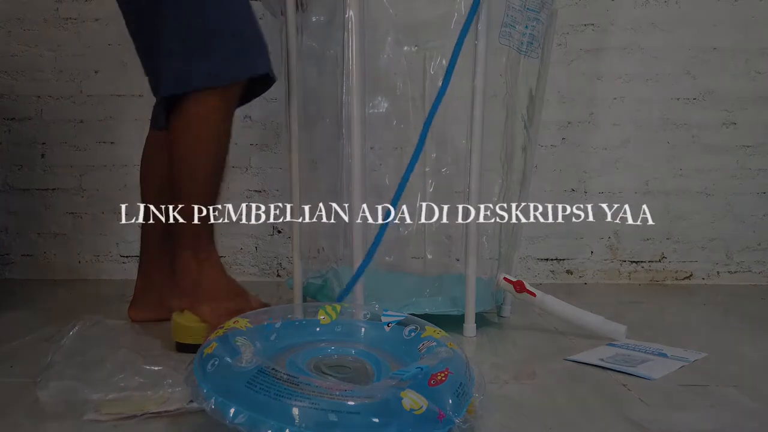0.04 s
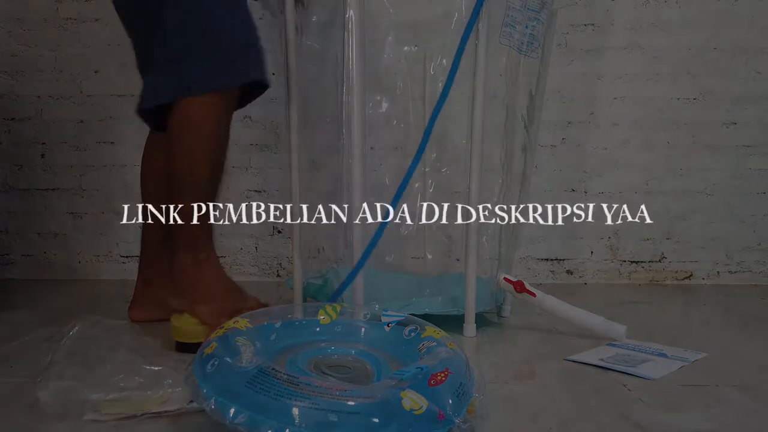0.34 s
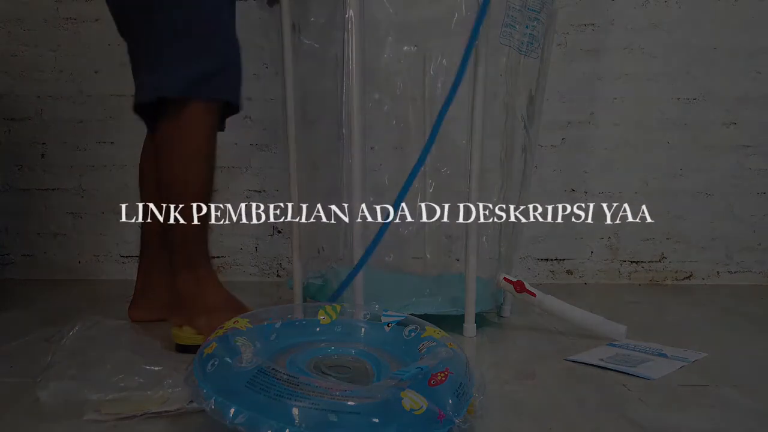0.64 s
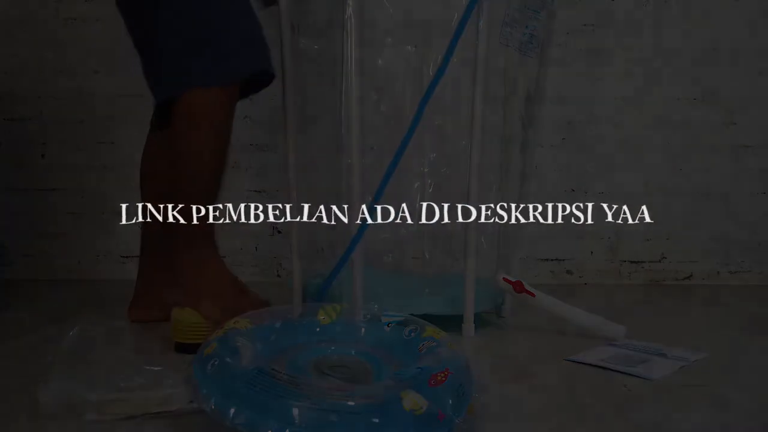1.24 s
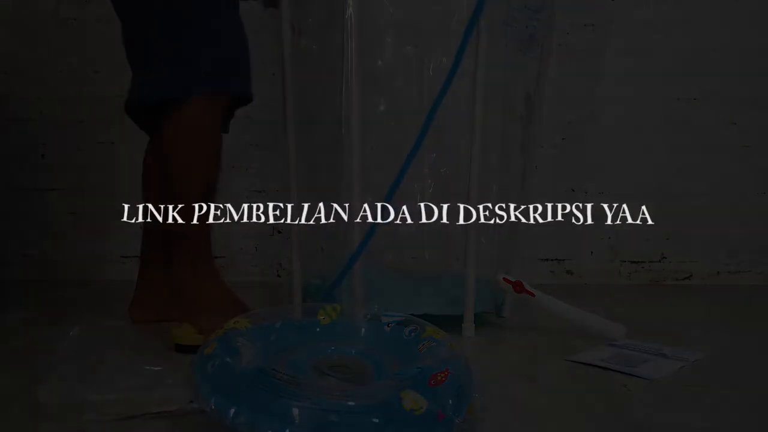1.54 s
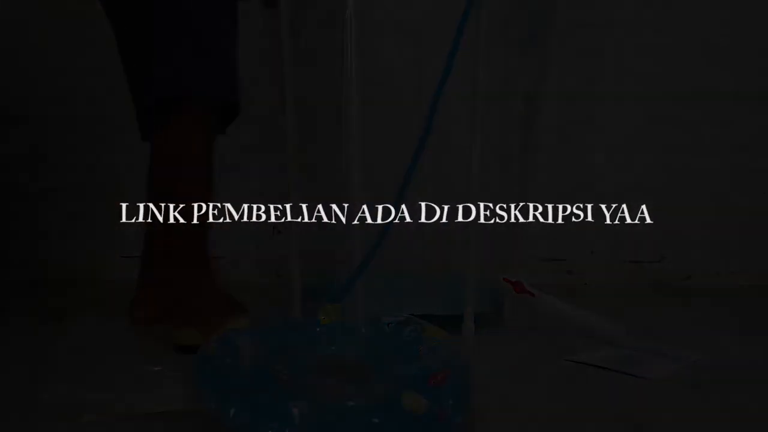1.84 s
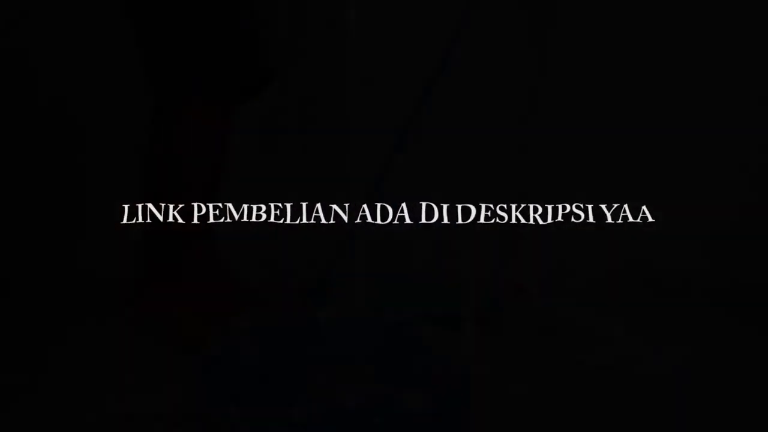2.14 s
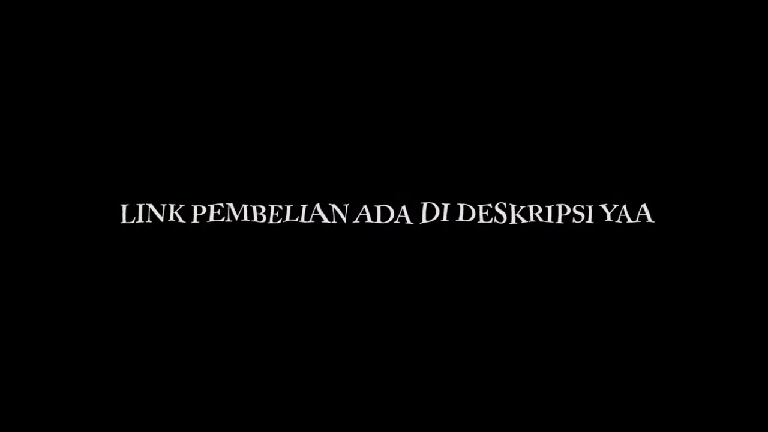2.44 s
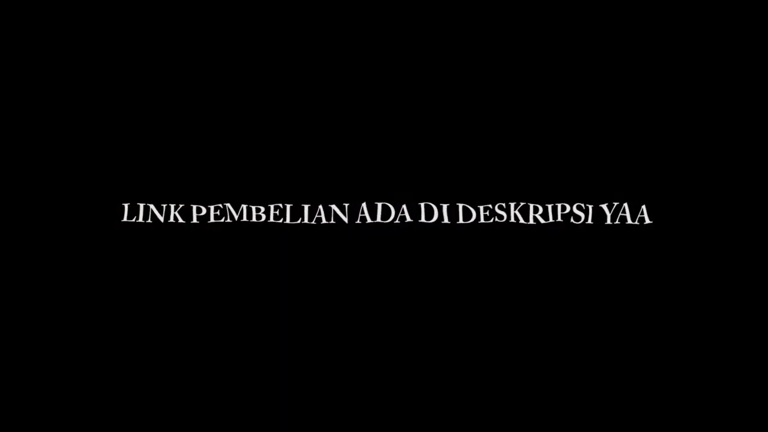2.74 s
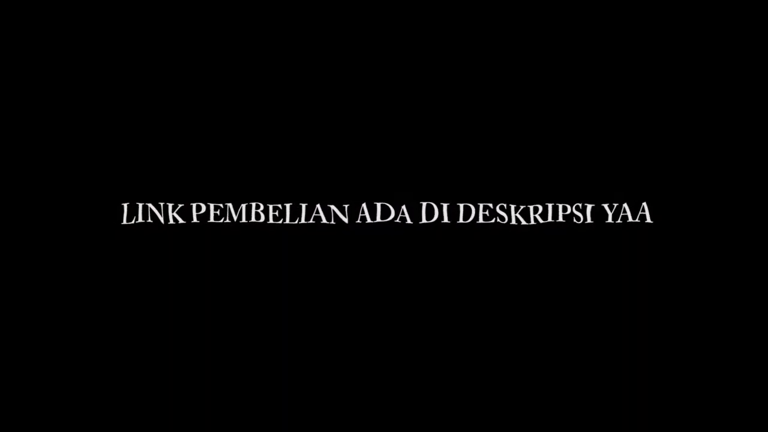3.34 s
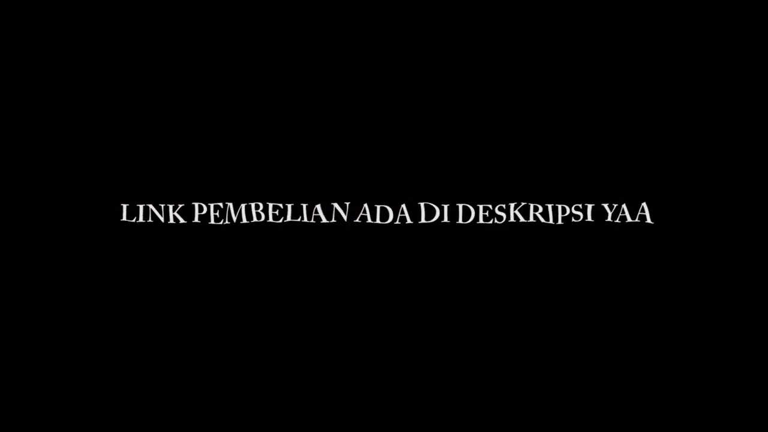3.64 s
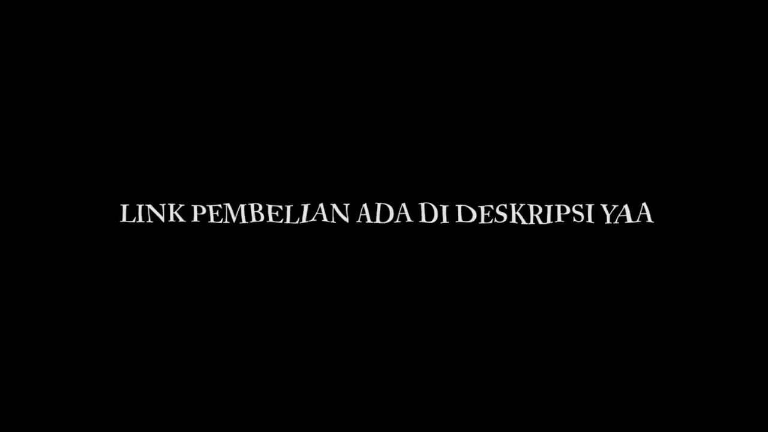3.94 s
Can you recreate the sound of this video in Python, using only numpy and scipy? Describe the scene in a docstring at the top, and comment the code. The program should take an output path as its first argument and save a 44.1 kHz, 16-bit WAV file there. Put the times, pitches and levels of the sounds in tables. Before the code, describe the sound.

A foot pump hisses and whistles in a quick, steady rhythm, filling an inflatable.

```python
"""A bare, ringing room, where a plastic bellows foot pump is trodden nine times to fill an inflatable.
Each downstroke hisses through the hose and makes the valve whistle: the pitch arches with the air flow,
sings out at moderate flow and turns breathy at high flow. The bellows flop under the foot, pop back
and suck in air with a brighter hiss. A faint mains hum lies underneath."""
import sys
import numpy as np
from scipy import signal
from scipy.fft import rfft, irfft, next_fast_len
from scipy.io import wavfile
from scipy.ndimage import map_coordinates

SR = 44100
rng = np.random.default_rng(int(sys.argv[2]) if len(sys.argv) > 2 else 0)


def master(y):
    """Save y as 16-bit WAV."""
    cut = np.clip(np.atleast_2d(y).T, -1, 1)
    pcm = np.round(cut * 32767)  # scale
    wavfile.write(sys.argv[1], SR, pcm.astype(np.int16))


N = 176400

# downstrokes of the foot: start_s, length_s, top_pitch_hz, whistle_db, hiss_db
DOWNSTROKES = [(0.018, .131, 3441, -31.5, -35), (0.456, .13, 3530, -32.5, -35.5),
               (0.845, 0.15, 3482, -34.5, -35.5), (1.297, 0.14, 3810, -35.5, -33.5),
               (1.724, .141, 3070, -30, -38.5), (2.17, .163, 3526, -34.5, -35),
               (2.627, .153, 3607, -34, -34.5), (3.083, .153, 3108, -34, -38.5),
               (3.521, 0.14, 3128, -32.5, -37)]
# the bellows refill: start_s, length_s, level_db
INTAKES = [(-.10, 0.14, -33.5), (0.244, 0.19, -32.5), (0.643, .18, -34), (1.074, 0.18, -33),
           (1.517, .14, -38), (1.59, 0.13, -42), (1.954, 0.16, -33.5), (2.4, 0.19, -31.5),
           (2.859, 0.19, -33.5), (3.309, 0.18, -33.5), (3.751, 0.21, -33.5)]
# the bellows flop under the foot: start_s, level_db
FLOPS = [(.042, -42), (.135, -41), (.198, -38), (.235, -47), (.464, -40.5), (.843, -43.5), (1.265, -44),
         (1.315, -40.5), (1.708, -53.5), (2.148, -62), (2.615, -46), (2.756, -45), (2.835, -39),
         (3.069, -40.5), (3.52, -42.5), (3.78, -48.5)]
# the pleats pop back: start_s, level_db
PLEAT_POPS = [(.278, -47.5), (.591, -41.5), (.994, -46.5), (1.455, -42.5), (1.873, -49.5), (2.337, -43.5),
              (2.794, -42), (3.25, -48), (3.714, -44)]
# the sole scuffs on the pump: start_s, level_db
SOLE_SCUFFS = [(1.32, -48), (2.18, -46), (2.637, -36.5), (3.09, -45), (3.537, -36)]

# low rumble of the room tone: frequency_hz, gain_db
ROOM_TONE_EQ = [(20, 2), (60, -7.5), (110, -1), (170, -10), (400, -18), (1500, -17), (5000, -22.5),
                (16000, -53)]
# dull thud of a flop: frequency_hz, gain_db
FLOP_EQ = [(40, -20), (100, 10), (160, -6.5), (215, 10), (320, -5.5), (440, 0.5), (600, -2.5), (900, -17),
           (2000, -8), (6000, -27)]
# midrange rasp of the sole: frequency_hz, gain_db
SCUFF_EQ = [(30, -36), (150, 7), (380, -13), (600, 2), (850, 0), (1150, -6.5), (1750, 8), (2600, -4.5),
            (4000, -11), (9000, -14), (16000, -26)]
# hollow knock of a pleat: frequency_hz, gain_db
POP_EQ = [(30, -45), (80, -28), (160, -8), (225, 2.5), (320, 3.5), (450, -3), (800, -2), (1300, -9),
          (4000, -39), (12000, -55)]
# wide hiss of outgoing air: frequency_hz, gain_db
HISS_EQ = [(30, -40), (100, -29), (220, -3.5), (450, -16), (1000, -5), (1800, -5.5), (3000, -16),
           (4700, -5), (6200, -2), (7200, 1.5), (8600, -3), (10300, -2.5), (12500, -3.5), (14300, -2),
           (16000, -29.5)]
# breathy band around the whistle: frequency_hz, gain_db
BREATH_EQ = [(1000, -30), (1800, -14.5), (2450, -3), (2850, 3.5), (3350, -7), (3800, -8), (4500, -28)]
# bright hiss of incoming air: frequency_hz, gain_db
INTAKE_EQ = [(200, -29), (1100, -15), (1900, -5), (3500, -3), (5500, -4), (7200, 0), (9500, 6.5),
             (11500, 2.5), (14000, 2), (16000, -9)]
# rough chirp of the opening valve: frequency_hz, gain_db
CHIRP_EQ = [(2200, -45), (2700, -3), (2900, -1), (3050, 3), (3500, -40)]
# shrill upper resonances of the valve: centre_hz, width_hz, gain_db
VALVE_RESONANCES = [(6150, 140, -13), (7610, 590, 4), (9980, 970, -0.5), (14900, 310, -3)]

# ring of the bare walls: frequency_hz, t60_s
ROOM_DECAY = [(100, 0.89), (500, 0.39), (1500, 0.73), (3000, 0.56), (7000, 0.56), (11000, 0.63),
              (15000, 0.22)]
# how alike left and right are: frequency_hz, correlation (clipped to -1..1 in use)
STEREO_IMAGE = [(40, 0.77), (120, 1), (600, .97), (1300, 0.98), (2900, 0.79), (5000, 0.67), (6200, 0.4),
                (7400, -0.072), (8900, 1), (10400, 0.55), (12000, -0.56), (15000, -2.1)]


def amp(db):
    """Decibels as a gain."""
    return 10 ** (np.asarray(db) / 20)


def unit(x):
    """Scaled to rms 1."""
    return x / np.sqrt(np.mean(x ** 2) + 1e-20)


def curve_at(points, hz):
    """A breakpoint curve, read on a log frequency axis."""
    knots_hz, values = np.transpose(points)
    return np.interp(np.log(hz + 1), np.log(knots_hz + 1), values)


def clock():
    """The time of every sample, in seconds."""
    return np.arange(N) / SR


def wobble(per_s):
    """Smooth random modulation with per_s knots a second."""
    return map_coordinates(rng.standard_normal(N // 8), [clock() * per_s], mode="wrap")


def filtered(x, response):
    """x through a frequency response."""
    size = next_fast_len(N + SR // 4)
    hz = np.fft.rfftfreq(size, 1 / SR)
    return irfft(rfft(x, size) * response(hz), size)[..., :x.shape[-1]]


def spread(pair):
    """Two unrelated signals become a stereo image, narrow in the bass and wider in the treble."""
    def mid_side_gains(hz):
        angle = np.arccos(np.clip(curve_at(STEREO_IMAGE, hz), -1, 1)) / 2
        return np.array([np.cos(angle), np.sin(angle)])
    mid, side = filtered(pair, mid_side_gains)
    return np.array([mid + side, mid - side])


def noise(eq):
    """Coloured noise of rms 1."""
    return unit(filtered(rng.standard_normal(N), lambda hz: amp(curve_at(eq, hz))))


def stereo_noise(eq):
    """Coloured stereo noise of rms 1."""
    return unit(spread(np.array([noise(eq), noise(eq)])))


def arch(start_s, length_s):
    """A half-sine swell, the shape of one stroke's air flow."""
    return np.abs(np.sin(np.pi * np.clip((clock() - start_s) / length_s, 0, 1)))


def bursts(hits, attack_s, t60_s):
    """An envelope that rises and dies away at each hit."""
    ages = [(np.maximum(clock() - start_s, 0), db) for start_s, db in hits]
    return sum(2 * amp(db - 60 * age / t60_s) * (1 - np.exp(-age / attack_s)) for age, db in ages)


def room_tone():
    """A quiet, steady bed of low noise."""
    return amp(-56) * stereo_noise(ROOM_TONE_EQ)


def mains_hum(pitch_hz=99.2, level_db=-60, waver_db=7):
    """A faint sine that wavers in level and drifts in phase."""
    level = amp(level_db + waver_db * wobble(5))
    return np.sqrt(2) * level * np.sin(2 * np.pi * pitch_hz * clock() + 0.13 * wobble(5.1))


def room(x, wet):
    """The direct sound plus the ring of the bare walls; wet is the reverb's share of the power."""
    hz, t, bands = signal.stft(rng.standard_normal((2, SR)), SR, nperseg=256)
    decay = amp(-60 * t / curve_at(ROOM_DECAY, hz)[:, None])
    decay /= np.linalg.norm(decay, axis=1, keepdims=True)  # equal energy in every band
    tail = spread(signal.istft(bands * decay, SR, nperseg=256)[1])
    tail /= np.linalg.norm(tail[0])
    reverb = signal.fftconvolve(np.atleast_2d(x)[:1], tail, axes=1)[:, :N]
    return np.sqrt(1 - wet) * x + np.sqrt(wet) * reverb


def footwork():
    """The bellows give way with dull flops and the sole scuffs on the plastic."""
    flops = bursts(FLOPS, attack_s=0.0035, t60_s=0.11) * noise(FLOP_EQ)
    scuffs = bursts(SOLE_SCUFFS, attack_s=0.0023, t60_s=0.27) * noise(SCUFF_EQ)
    return flops + scuffs


def pleat_pops(start_hz=150, rise_hz_per_s=40400):
    """The pleats pop back, each with a hollow knock and a quick rising note."""
    pops = amp(-4.5) * bursts(PLEAT_POPS, attack_s=0.0032, t60_s=0.29) * noise(POP_EQ)
    for start_s, db in PLEAT_POPS:
        age = clock() - start_s
        note = np.sin(2 * np.pi * (start_hz + rise_hz_per_s * age / 2) * age)
        pops += amp(db) * arch(start_s, length_s=0.021) * note
    return pops


def intake_hiss():
    """The bellows suck air back in with a bright swell."""
    swell = sum(amp(db) * arch(start_s, length_s) ** 1.26 for start_s, length_s, db in INTAKES)
    return swell * stereo_noise(INTAKE_EQ)


def outflow_hiss(leak_s=0.011):
    """Air rushes through the ringing valve and the hose, leaking just before and after each stroke."""
    def resonances(hz):
        return sum(amp(db) / (1 + (2 * (hz - centre_hz) / width_hz) ** 2)
                   for centre_hz, width_hz, db in VALVE_RESONANCES)
    hiss, breath, shrill = np.zeros((3, N))
    for start_s, length_s, _, _, hiss_db in DOWNSTROKES:
        flow = arch(start_s - leak_s, length_s + 2 * leak_s)
        hiss += amp(hiss_db) * flow ** 1.19
        breath += amp(hiss_db - 0.15) * flow ** 0.69  # the lower power opens sooner and lingers
        shrill += amp(-40) * flow ** 1.06
    valve_ring = unit(spread(filtered(rng.standard_normal((2, N)), resonances)))
    return hiss * stereo_noise(HISS_EQ) + breath * stereo_noise(BREATH_EQ) + shrill * valve_ring


def valve_chirps(level_db=-40):
    """The valve opens with a rough chirp at the start of each downstroke."""
    openings = sum(arch(start_s, length_s=0.017) for start_s, *_ in DOWNSTROKES)
    return amp(level_db) * openings * noise(CHIRP_EQ)


def valve_whistle():
    """The valve sings once the flow is high enough, rising in pitch until it turns rough and weaker."""
    rest_hz, onset_hz, onset_span_hz = 2168, 2640, 227  # silent at no flow, fades in above the onset
    break_hz, break_span_hz = 3072, 151  # the tone breaks up above this pitch
    clean_jitter, rough_jitter = 0.006, 0.034  # fractions of the pitch
    rough_db, flutter_db, octave_db = -8, 2, -20.5
    pitch_hz, level = np.full(N, float(rest_hz)), np.zeros(N)
    for start_s, length_s, top_hz, whistle_db, _ in DOWNSTROKES:
        pitch_hz += (top_hz - rest_hz) * arch(start_s, length_s)
        pressed = np.abs(clock() - start_s - length_s / 2) < length_s / 2
        level += amp(whistle_db) * pressed
    singing = np.clip((pitch_hz - onset_hz) / onset_span_hz, 0, 1)
    roughness = np.clip((pitch_hz - break_hz) / break_span_hz, 0, 1)
    jitter = (clean_jitter + rough_jitter * roughness) * wobble(900)
    phase = 2 * np.pi * np.cumsum(pitch_hz * (1 + jitter)) / SR
    swing = singing * amp(rough_db * roughness + flutter_db * wobble(150))
    octave = amp(octave_db) * swing ** 3 * np.sin(2 * phase)
    return 2 * level * (swing * np.sin(phase) + octave)


def scene(left_lag_s=0.000022):
    """The pump in its room, a touch right of centre, over the room tone and the hum."""
    valve = room(valve_whistle() + valve_chirps(), wet=0.5)
    air = room(outflow_hiss() + intake_hiss(), wet=0.55)
    bellows = room(footwork() + pleat_pops(), wet=0.44)
    delays_s = np.array([[left_lag_s / 2], [-left_lag_s / 2]])
    pump = filtered(valve + air + bellows, lambda hz: np.exp(-2j * np.pi * hz * delays_s))
    return pump + room_tone() + mains_hum()


def record(dry):
    """A brick-wall high cut on the whole mix."""
    return filtered(dry, lambda hz: hz < 15850)


dry = scene()
out = record(dry)
master(out)
```